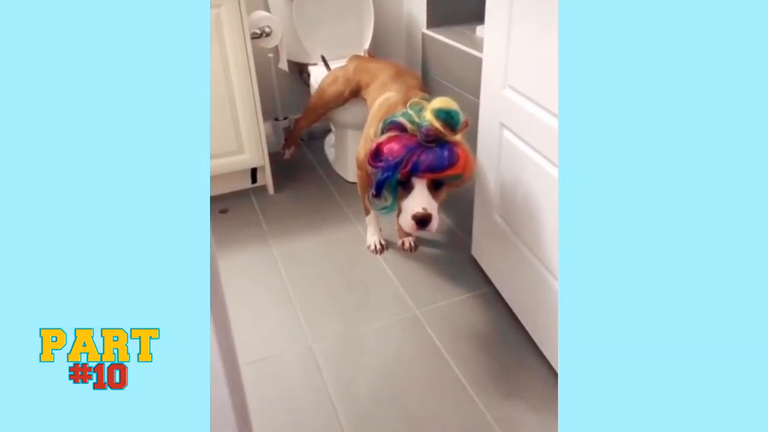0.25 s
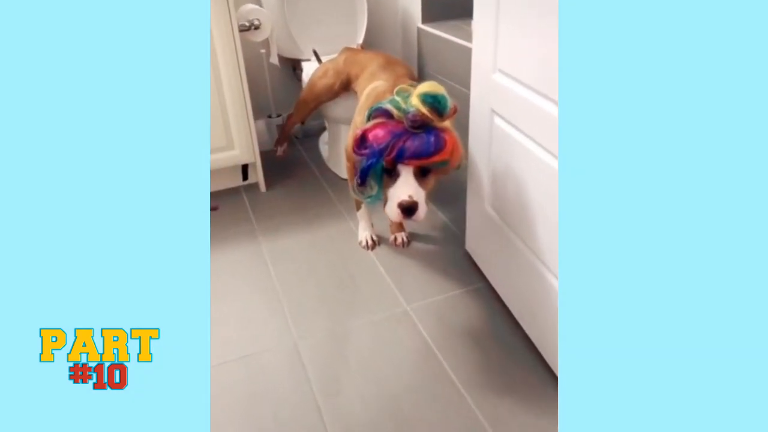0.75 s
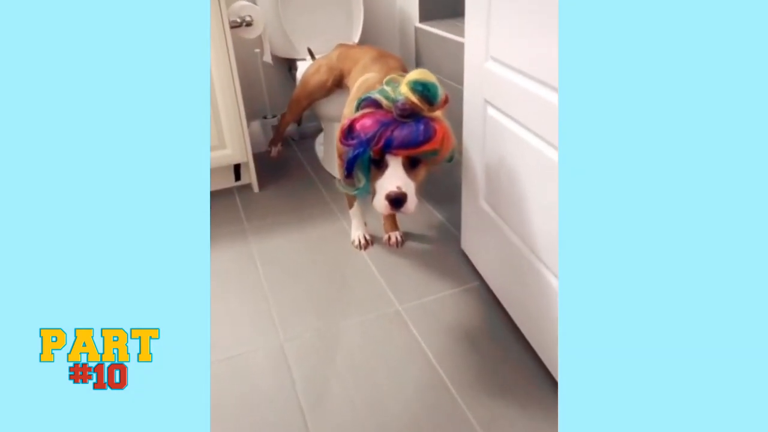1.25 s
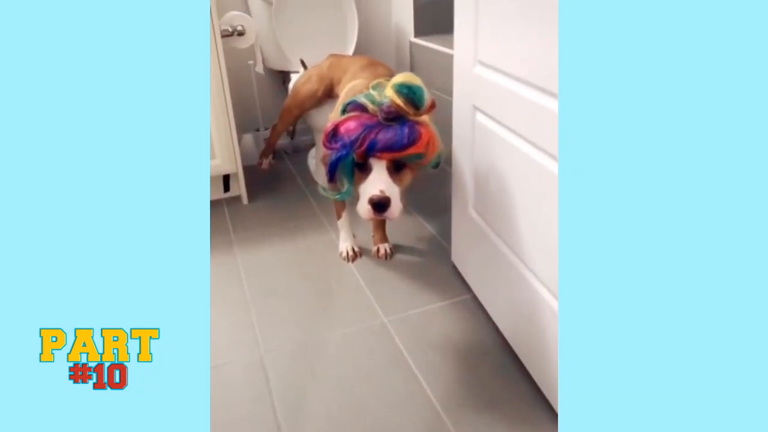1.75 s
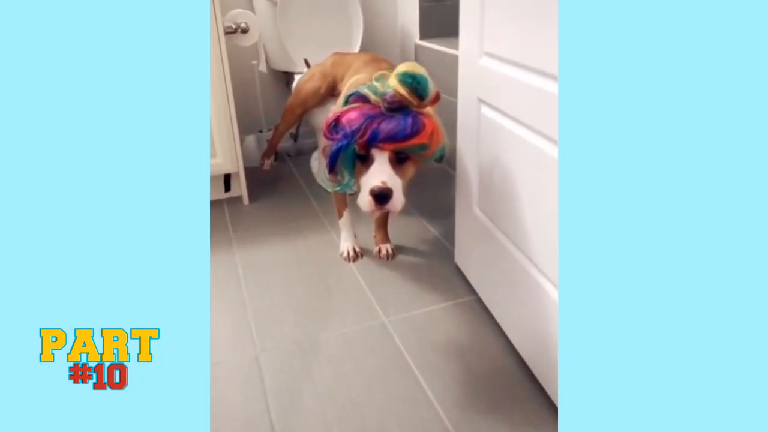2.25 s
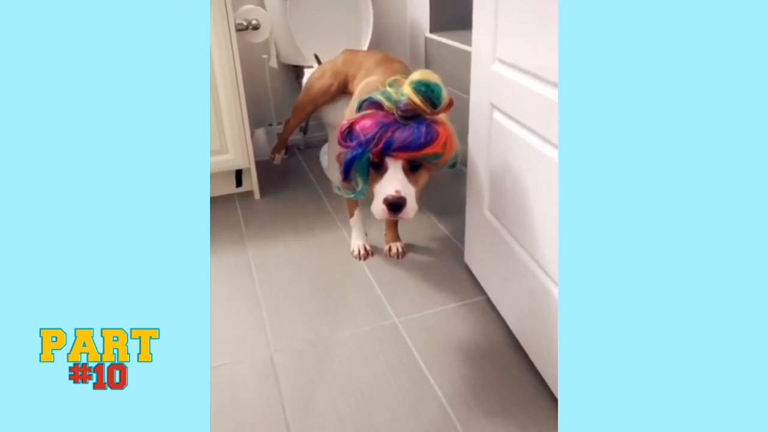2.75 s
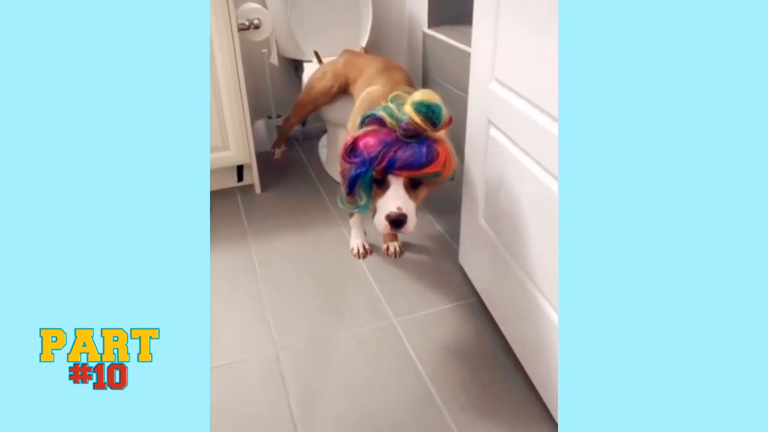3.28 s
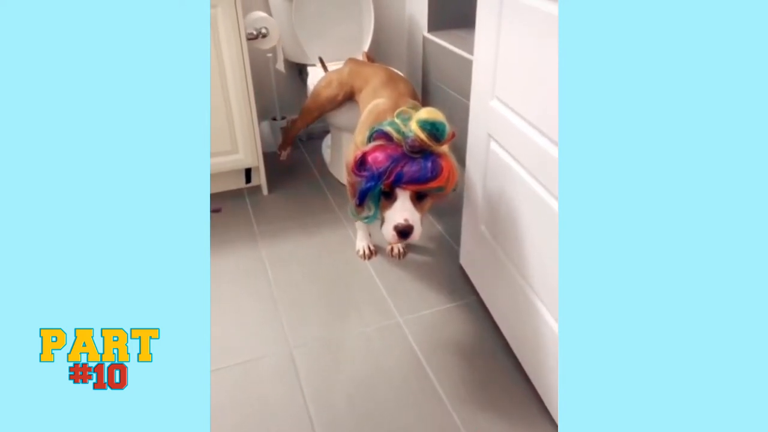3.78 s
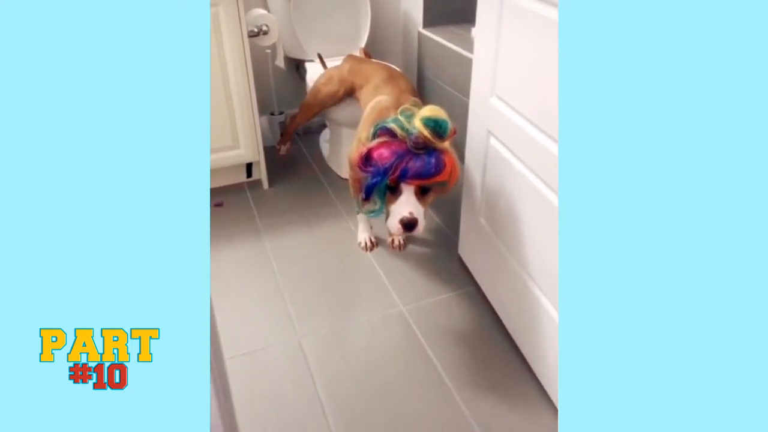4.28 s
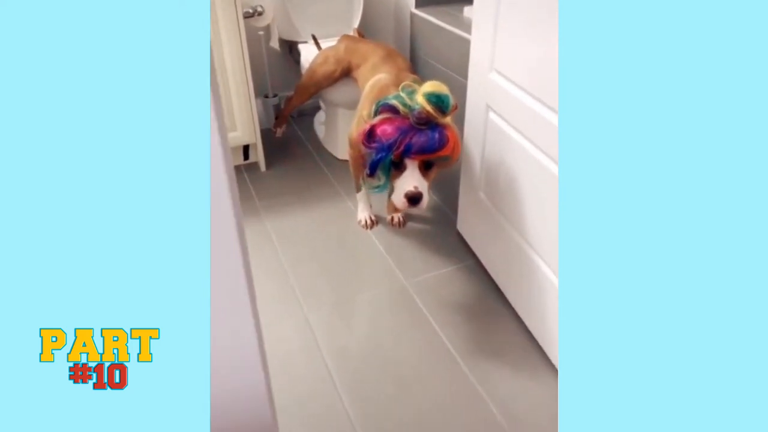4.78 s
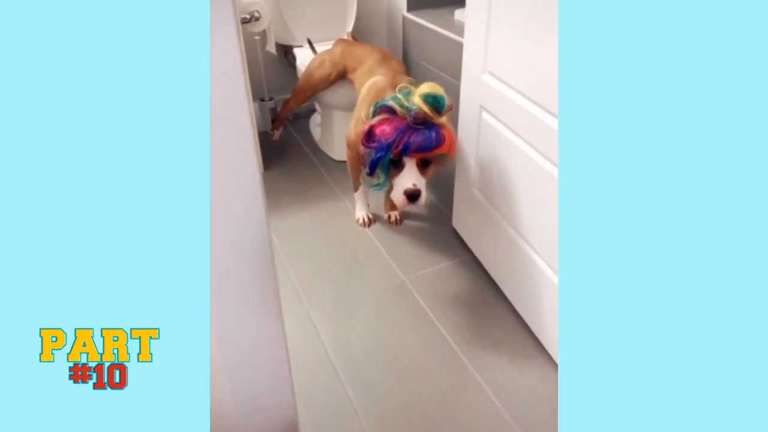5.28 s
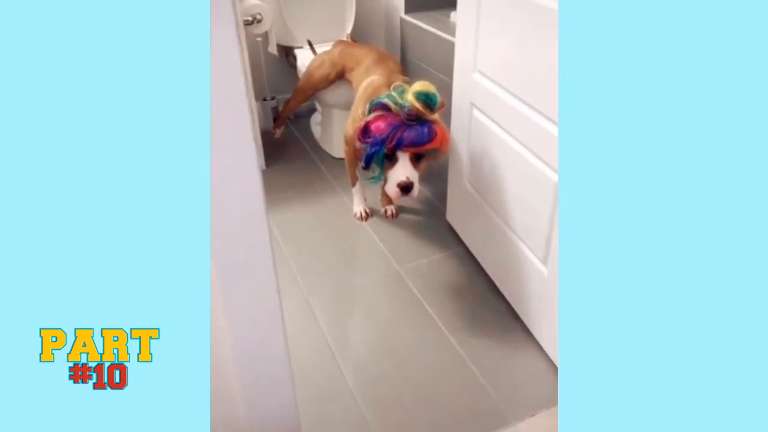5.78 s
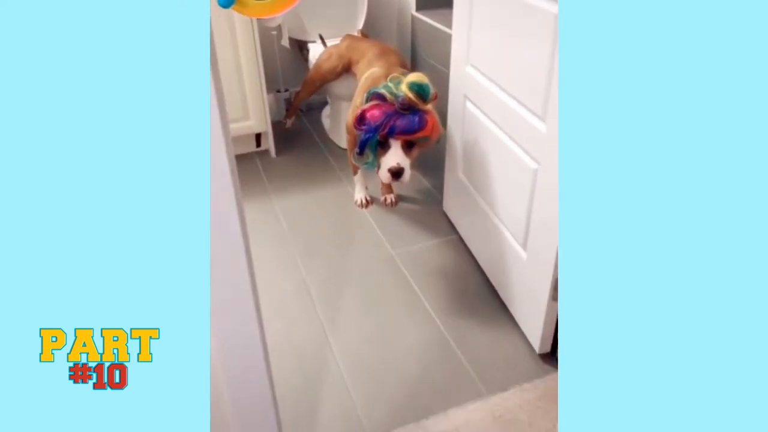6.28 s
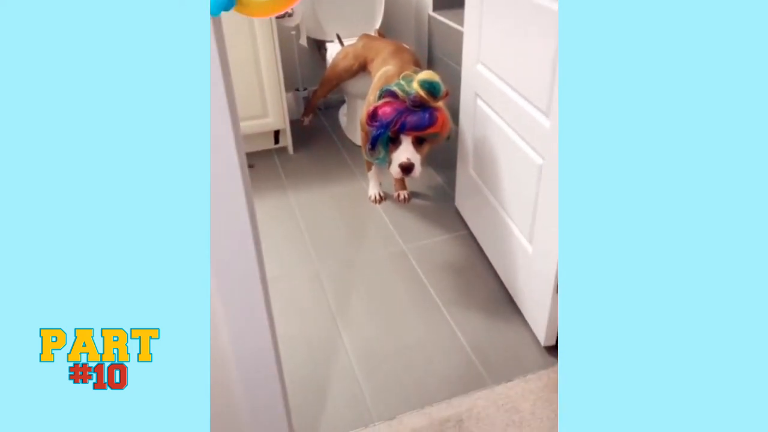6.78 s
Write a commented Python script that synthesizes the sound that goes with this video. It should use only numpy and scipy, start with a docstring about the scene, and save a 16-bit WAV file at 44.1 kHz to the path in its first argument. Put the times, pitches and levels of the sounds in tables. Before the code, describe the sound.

A thin stream splashes into a toilet bowl, stops, then returns in three shrinking spurts with drips and gurgles over a low fan rumble.

```python
"""A thin stream falls into the water of a toilet bowl in a tiled bathroom, stops, and comes back in three spurts.
Spray fizzes as coloured noise and tiny bubbles ringing the porcelain; larger bubbles gurgle through the bowl's air.
The plume of air under the jet rings and booms low, stray drops ping in the pauses as clusters of damped tones,
and a few dry knocks sound close by. A fan of low noise and wavering hum rumbles behind it all."""
import sys
import numpy as np
from scipy import signal
from scipy.fft import rfft, irfft
from scipy.io import wavfile
from scipy.ndimage import uniform_filter1d

SR = 44100
rng = np.random.default_rng(int(sys.argv[2]) if len(sys.argv) > 2 else 0)


def master(y):
    """Save y as 16-bit WAV."""
    cut = np.clip(np.atleast_2d(y).T, -1, 1)
    pcm = np.round(cut * 32767)  # scale
    wavfile.write(sys.argv[1], SR, pcm.astype(np.int16))


N = 310464

# Single drops, each trapping a few small bubbles:
# (time [s], peak level [dB], middle pitch [Hz], spread of bubble sizes [octaves])
DROPS = [(0.105, -16, 5910, 0.35), (0.394, -11.5, 6450, 0.16), (0.685, -17, 4070, 0.66),
         (0.733, -16, 5820, 0.13), (0.861, -15, 3350, 0.38), (0.908, -13, 6400, 0.31),
         (1.328, -15, 6460, 0.14), (1.456, -18, 4170, 0.51), (1.585, -17.5, 4630, 0.35),
         (2.076, -37, 4700, 0.58), (2.342, -32, 7400, 0.11), (2.539, -33.5, 3370, 0.88),
         (2.737, -35.5, 5100, 0.51), (2.77, -22, 4000, 0.093), (2.777, -17.5, 6270, 0.24),
         (2.789, -11.5, 2530, 0.52), (2.967, -18, 4860, 0.52), (3.055, -13.5, 5300, 0.45),
         (3.147, -3, 4580, 0.33), (3.311, -18.5, 6450, 0.2), (3.618, -36.5, 3390, 0.26),
         (3.687, -30, 5100, 0.078), (3.751, -33.5, 6550, 0.32), (3.786, -36.5, 4940, 0.34),
         (3.913, -36.5, 5970, 0.446), (4.045, -38.5, 5470, 0.4), (4.186, -45, 7300, 0.2),
         (4.51, -14, 6520, 0.29), (4.53, -16.5, 3650, 0.25), (4.573, -11, 3900, 0.65),
         (4.679, -13, 3190, 0.46), (4.748, -17, 5180, 0.46), (5.185, -39, 7530, 0.27),
         (5.942, -41, 5770, 0.87), (6.156, -16.5, 5280, 0.27), (6.215, -19, 5560, 0.54),
         (6.488, -37, 4220, 0.37), (6.565, -38, 6450, 0.23), (6.793, -41.5, 6450, 0.39)]
# The jet lands, drives its air under a moment later, and stops; pairs hold the value at the start and at the stop:
# (landing [s], plunge [s], stop [s], spray pair [dB], plume pair [dB], plume pitch pair [Hz],
#  deep gurgle pair [dB], high gurgle pair [dB], spray fall [dB/s], bubble fall [dB/s])
SPURTS = [(-.5, -.5, 1.64, (-36, -35.5), (-45, -32), (280, 300), (-38, -38), (-44, -44.5), 110, 70),
          (2.775, 2.79, 3.505, (-30, -40.5), (-29, -38), (208, 295), (-41, -44), (-38.5, -45), 450, 160),
          (4.505, 4.575, 4.77, (-35, -39), (-39, -36), (205, 255), (-41, -43), (-39, -51), 170, 85),
          (6.146, 6.21, 6.3, (-36, -41), (-25, -32.5), (300, 335), (-40, -46), (-37, -45), 200, 110)]
KICK_DB = 7  # extra strength as the jet plunges


def gain_of(db):
    """Decibels to a factor."""
    return 10 ** (np.asarray(db) / 20)


def evened(x):
    """Scales to rms 1."""
    return x / np.sqrt(np.mean(x ** 2) + 1e-20)


def read(points, hz):
    """Reads a table of values by frequency on a log-frequency axis."""
    f, value = np.transpose(points)
    return np.interp(np.log(hz + 1), np.log(f + 1), value)


def coloured(x, points):
    """Weighs a sound by a spectrum in dB."""
    return irfft(rfft(x) * gain_of(read(points, np.fft.rfftfreq(N, 1 / SR))), N)


def resonate(x, hz, width):
    """A resonance of gain 1 on a fixed or moving pitch: shifts hz down to zero, smooths, and shifts back."""
    turn = np.exp(2j * np.pi * np.cumsum(hz * np.ones(len(x))) / SR)
    r = np.exp(-np.pi * width / SR)
    smooth = signal.lfilter([1 - r], [1, -r], x / turn + 1e-18)
    return 2 * (turn * smooth).real


def slow(per_s):
    """Chance that wanders at about this rate."""
    span = round(SR / per_s)
    return evened(uniform_filter1d(uniform_filter1d(rng.standard_normal(N), span), span))


def place(parts):
    """Sums (time [s], sound) pairs on the time line."""
    out = np.zeros(N)
    for s, sound in parts:
        part = out[round(s * SR):][:len(sound)]
        part += sound[:len(part)]
    return out


def bubble(hz, t60, rise, glide):
    """A damped tone whose pitch climbs as the bubble nears the surface."""
    t = np.arange(round((t60 + 3 * rise) * SR)) / SR
    shape = (1 - np.exp(-t / rise)) * gain_of(-60 * t / t60)
    return shape / shape.max() * np.sin(2 * np.pi * hz * t * (1 + glide * t / t60))


def swarm(low_hz, high_hz, cycles, per_s, spread_db, count=30):
    """Bubbles of many sizes, each size on its own random train; a few are much louder."""
    starts = rng.random(N) < per_s / SR
    strength = gain_of(spread_db * np.minimum(rng.exponential(1, N), 5)) * starts
    kind, out = rng.integers(0, count, N), np.zeros(N)
    for k, hz in enumerate(np.geomspace(low_hz, high_hz, count)):
        one = np.sqrt(hz) * bubble(hz, cycles / hz, 1 / hz, 0.15)
        out += signal.oaconvolve(strength * (kind == k), one)[:N]
    return evened(out)


def cluster(row, chance, t60):
    """A handful of bubbles, smaller and larger than the middle one, start within a moment."""
    s, db, hz, octaves = row
    tone = np.zeros(round(.1 * SR))
    for size, (jitter, late) in zip(np.linspace(-1.5, 1.5, len(chance)), chance):
        f = min(hz * 2 ** (octaves * (size + .3 * (jitter - .5))), 9300)
        one = np.exp(-.25 * size ** 2) * bubble(f, t60, 0.4 / f, 0.017)[:3000]
        start = round(late * .0012 * SR)
        tone[start:start + len(one)] += one
    return s, gain_of(db) * tone / abs(tone).max()


def ramp(start, stop, pair, rise, fall_db_per_s):
    """Level in dB: up from silence, straight from one value to the other, then a steady fall."""
    t = np.arange(N) / SR
    level_db = np.interp(t, [start - rise, start, stop], [pair[0] - 60, *pair])
    return level_db - fall_db_per_s * np.maximum(t - stop, 0) - 99 * (t < start - rise)


def jet():
    """The spray's strength without the splashes of single drops; a trickle under it dies slowly after the stop."""
    land_s = .014  # time to rise from silence
    trickle_db, trickle_db_per_s = -13.5, 25  # below the spray, and its fall
    power = np.zeros(N)
    for lands, _, stops, spray_db, *_, shut_db_per_s, _ in SPURTS:
        power += gain_of(ramp(lands, stops, spray_db, land_s, shut_db_per_s)) ** 2
        power += gain_of(trickle_db + ramp(lands, stops, spray_db, land_s, trickle_db_per_s)) ** 2
    return np.sqrt(power)


def underwater(column, kick_db):
    """Strength of a layer that the plunging jet drives, from one level pair of each spurt."""
    kick_s, plunge_s = .04, .015  # dying time of the kick, time to rise from silence
    since = np.arange(N) / SR - np.array([[row[1]] for row in SPURTS])
    kick = kick_db * np.exp(-np.maximum(since, 0) / kick_s)
    return sum(gain_of(k + ramp(row[1], row[2], row[column], plunge_s, row[-1]))
               for row, k in zip(SPURTS, kick))


def fan():
    """A steady low rumble and a wavering motor hum over faint hiss."""
    # Noise of the fan: (frequency [Hz], relative level per Hz [dB])
    fan_spectrum = [(12, -30.5), (20, -0.5), (59, 1.5), (80, 4), (107, -1.5), (165, -13.5), (357, -18.5),
                    (462, -23.5), (598, -23), (880, -29.5), (1110, -29), (2730, -42), (7850, -57.5),
                    (9400, -50), (12200, -105), (20700, -120)]
    # Motor hum: (middle pitch [Hz], level before a 2 dB lift and the waver [dB])
    motor_tones = [(59.2, -50)]
    hum = np.zeros(N)
    for hz, db in motor_tones:
        level_db = db + 2 + 2.5 * slow(5.4)
        pitch = hz * (1 + 0.016 * slow(3))
        hum += gain_of(level_db) * np.sin(2 * np.pi * np.cumsum(pitch) / SR)
    return hum + gain_of(-43) * evened(coloured(rng.standard_normal(N), fan_spectrum))


def patchy(x, patch_db, surge_db):
    """Churning: the level drifts in patches of pitch and time, and surges across all pitches."""
    z = signal.stft(x, nperseg=256)[2]
    field = rng.standard_normal(z.shape[::-1]).T
    patches = evened(uniform_filter1d(uniform_filter1d(field, size=5, axis=0), size=10, axis=1))
    surges = evened(uniform_filter1d(rng.standard_normal(z.shape[1]), size=5))
    churned = z * gain_of(patch_db * patches + surge_db * surges)
    return evened(signal.istft(churned, nperseg=256)[1][:N])


def splashes():
    """Each drop lifts the spray for a moment: a short swell, then a dying fade."""
    below_db, most_db = -19, -32.5  # against the drop's peak, and at most
    lead_s, dying_s = .007, .03
    t = np.arange(-lead_s, 6 * dying_s, 1 / SR)
    fade = np.where(t < 0, 1 + t / lead_s, np.exp(-t / dying_s))
    return place((s - lead_s, gain_of(min(db + below_db, most_db)) * fade) for s, db, *_ in DROPS)


def spray():
    """Tiny bubbles over the hiss of the breaking jet; the splash rings the porcelain."""
    # Colour of the splash: (frequency [Hz], relative level per Hz [dB])
    spray_spectrum = [(710, -17.5), (1200, -1), (1320, 0), (1680, -6), (2270, 0.5), (3290, -1.5),
                      (4180, -1), (4680, -1.5), (6380, 0.5), (8850, -6.5), (9400, -16.5), (12200, -52.5),
                      (20700, -120)]
    # Ringing modes of the porcelain: (frequency [Hz], width [Hz], relative level [dB])
    porcelain_modes = [(2514, 50, -10), (2824, 41, 2), (3950, 50, -9), (4290, 300, 4), (5354, 200, 6),
                       (6450, 120, -2.5)]
    # The stream falters: (time [s], level change [dB])
    lulls = [(.06, -6), (.16, -3), (.5, -7), (.78, -5), (1.0, -2.5), (4.555, -4), (6.19, -2)]
    lull_s = .03
    body_hz = 2300  # below this the spray grows full only once the jet has plunged

    fizz = swarm(1613.4, 9244, cycles=100, per_s=2000, spread_db=3)
    splash = evened(coloured(0.88 * rng.standard_normal(N) + 0.55 * fizz, spray_spectrum))
    rung = sum(gain_of(db) * evened(resonate(splash, hz, width)) for hz, width, db in porcelain_modes)
    churn = patchy(splash + 0.16 * evened(rung), patch_db=2.8, surge_db=2.0)
    body = coloured(churn, [(body_hz / 1.3, 0), (body_hz * 1.3, -40)])
    treble = churn - body

    t = np.arange(N) / SR
    lull_db = sum(db * np.exp(-((t - s) / lull_s) ** 2) for s, db in lulls)
    top_gain = np.hypot(jet(), splashes())
    body_gain = np.hypot(.45 * top_gain, underwater(column=3, kick_db=KICK_DB))
    return gain_of(lull_db) * (top_gain * treble + body_gain * body)


def gurgle():
    """Middle-sized bubbles sound through the air of the bowl: larger ones in its deep modes, smaller in its high."""
    # Modes of the air in the bowl: (frequency [Hz], width [Hz], relative level [dB])
    bowl_modes = [(517, 86, 8.5), (791, 9.3, -6.5), (1010, 67, -1.5), (1310, 110, -2), (1500, 40, -9)]
    out = np.zeros(N)
    for column, low_hz, high_hz in [(6, 380, 880), (7, 880, 1900)]:
        drive = swarm(low_hz, high_hz, cycles=11, per_s=300, spread_db=3, count=12)
        rung = sum(gain_of(db) * evened(resonate(drive, hz, width))
                   for hz, width, db in bowl_modes if low_hz < hz < high_hz)
        out += underwater(column, kick_db=KICK_DB) * evened(evened(rung) + 0.76 * drive)
    return out


def plume():
    """The cloud of air under the jet rings as one body; its pitch climbs as it shrinks."""
    times = np.ravel([(row[0], row[2]) for row in SPURTS])
    pitches = np.ravel([row[5] for row in SPURTS])
    t = np.arange(N) / SR
    spurt = np.searchsorted(times[::2], t) - 1
    # after each stop the pitch holds until the next landing
    hz = np.interp(np.minimum(t, times[1::2][spurt]), times, pitches)
    drive = swarm(178.3, 452, cycles=8.9, per_s=250, spread_db=2.0, count=10)
    rung = resonate(resonate(drive, hz, 180), hz, 220)
    return underwater(column=4, kick_db=0) * evened(rung + 0.36 * drive)


def singles():
    """Drops and large bubbles stand out from the flow; lesser drops fall at random, as loud as the spray allows."""
    # Large bubbles: (time [s], peak level [dB], starting pitch [Hz], 60 dB decay time [s])
    glugs = [(0.129, -30, 510, 0.1), (0.388, -26, 503, 0.09), (0.479, -30, 969, 0.091),
             (0.81, -25, 540, 0.073), (0.906, -27, 1010, 0.055), (1.757, -36, 791, 0.25),
             (1.85, -39, 410, 0.3), (3.526, -24, 517, 0.085), (4.574, -27, 1170, 0.078),
             (4.662, -28.5, 1010, 0.077), (6.181, -33, 660, 0.043), (6.224, -26.5, 510, 0.052)]
    drips_per_s, drip_db = 25, 9
    follows = .86  # share of the spray's level in dB that the lesser drops follow

    when, soft, pitch, wide = rng.random((round(drips_per_s * N / SR), 4)).T
    spray_db = 20 * np.log10(jet()[(when * N).astype(int)] + 1e-9)
    level_db = follows * spray_db + drip_db - 8 * soft
    rows = DROPS + list(zip(when * N / SR, level_db, 3800 * 2.2 ** pitch, .15 + .5 * wide))
    drops = place(cluster(row, c, 0.022) for row, c in zip(rows, rng.random((len(rows), 7, 2))))
    large = place((s, gain_of(db) * bubble(hz, t60, 0.94 / hz, 0.017)) for s, db, hz, t60 in glugs)
    return drops + large


def boom(s, db, hz, rise, fall):
    """A nearly pure low tone that swells smoothly and dies away."""
    t = np.arange(-3 * rise, 6 * fall, 1 / SR)
    drop_db = 6 * np.where(t < 0, (t / rise) ** 2, (abs(t) / fall) ** 1.5)
    return s - 3 * rise, gain_of(db - drop_db) * np.sin(2 * np.pi * hz * t)


def booms():
    """The whole plume swells and rings once, time after time."""
    # (time of the top [s], top level [dB], pitch [Hz], rise through the last 6 dB [s], fall by 6 dB [s])
    plume_booms = [(1.215, -26, 316, .014, .006), (1.317, -21, 306, .006, .006),
                   (1.382, -19, 260, .006, .006), (1.403, -19, 291, .005, .006),
                   (1.495, -25, 275, .007, .012), (2.815, -13, 210, .008, .017),
                   (2.876, -22, 228, .012, .008), (2.915, -22, 218, .009, .012),
                   (2.952, -19.5, 211, .01, .016), (3.026, -18.5, 234, .008, .006),
                   (3.085, -11, 250, .017, .017), (3.142, -19.5, 248, .013, .01),
                   (3.345, -20, 295, .012, .007), (3.42, -24, 277, .01, .01),
                   (4.605, -13.5, 205, .013, .034), (4.672, -21, 250, .008, .01),
                   (4.705, -20, 233, .008, .008), (4.768, -23.5, 250, .006, .008),
                   (4.798, -25, 265, .006, .007), (6.222, -23, 330, .004, .016),
                   (6.274, -22.5, 321, .011, .006)]
    return place(boom(*row) for row in plume_booms)


def dribble():
    """As the jet thins to a dribble it makes bubbles of one size: a quick flutter through a narrow resonance."""
    # (start [s], top [s], end [s], top level [dB], pitch [Hz])
    dribbles = [(1.64, 1.8, 2.08, -48, 2550), (3.33, 3.456, 3.66, -40, 2740)]
    rise_db, fade_db = 7, 22
    flutter = swarm(2290, 2700, cycles=7.2, per_s=49, spread_db=0, count=8)
    t, out = np.arange(N) / SR, np.zeros(N)
    for start, top, end, db, hz in dribbles:
        level_db = np.interp(t, [start, top, end], [db - rise_db, db, db - fade_db], -99, -99)
        out += gain_of(level_db) * evened(resonate(flutter, hz, 176))
    return out


def knocks():
    """Small dry knocks, clusters of short damped tones too near to carry any echo."""
    # (time [s], peak level [dB], middle pitch [Hz], spread of tones [octaves])
    near_knocks = [(2.291, -30, 940, 0.23), (2.297, -39, 660, 0.13), (2.315, -35, 910, 0.44),
                   (2.542, -44, 617, 0.98)]
    chances = rng.random((len(near_knocks), 3, 2))
    return place(cluster(row, c, 0.024) for row, c in zip(near_knocks, chances))


def bathroom(x):
    """Echo of sparse taps of random sign, one in every 20 samples, each band dying at its own speed."""
    # Decay between the tiles: (frequency [Hz], 60 dB decay time [s])
    tile_decay = [(200, 0.38), (530, 0.53), (1400, .5), (3700, 0.21), (8000, 0.17)]
    taps = np.zeros(SR)
    at = np.arange(300, SR - 20, 20)
    taps[at + rng.integers(0, 20, len(at))] = rng.choice([-1., 1.], len(at))
    hz, t, z = signal.stft(taps, SR, nperseg=256)
    decay = gain_of(-60 * t / read(tile_decay, hz)[:, None])
    tail = signal.istft(z * decay, SR, nperseg=256)[1]
    return signal.fftconvolve(x, tail / np.linalg.norm(tail))[:N]


def scene():
    """All sources lie straight ahead; the tiles answer all that happens in the bowl."""
    flow = spray() + dribble() + gurgle() + plume()
    single, low = singles(), booms()
    echo = gain_of(-11.5) * bathroom(flow + .5 * low) + gain_of(-5.5) * bathroom(single)
    mid = flow + single + low + echo + knocks() + fan()
    return np.array([mid, mid])


def record(dry):
    """A smeared side signal parts the two channels slightly in the treble; then the top is cut at 9.4 kHz."""
    # Spectrum of the side signal: (frequency [Hz], level [dB])
    side_spectrum = [(5500, -61), (9000, -7)]
    smear = rng.standard_normal(600) / np.sqrt(600)
    side = coloured(signal.oaconvolve(dry[0], smear)[:N], side_spectrum)
    wide = dry + np.array([side, -side])
    low_pass = signal.firwin(511, 9400, window=("kaiser", 10), fs=SR)
    return signal.oaconvolve(wide, low_pass[None], "same")


dry = scene()
out = record(dry)
master(out)
```